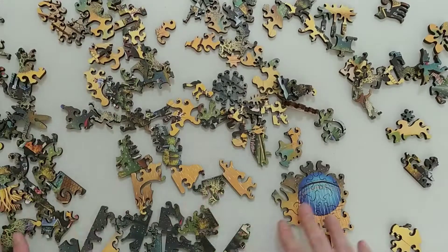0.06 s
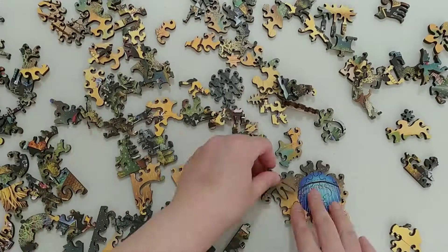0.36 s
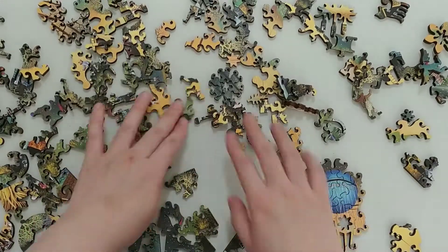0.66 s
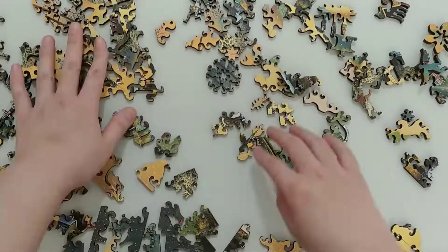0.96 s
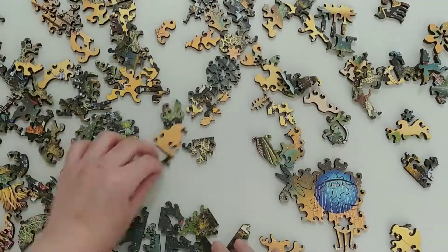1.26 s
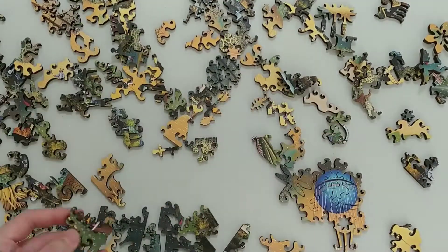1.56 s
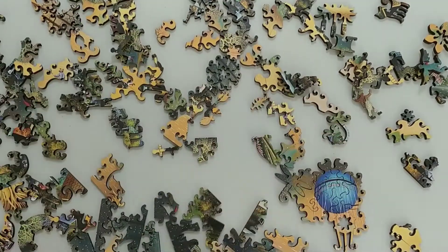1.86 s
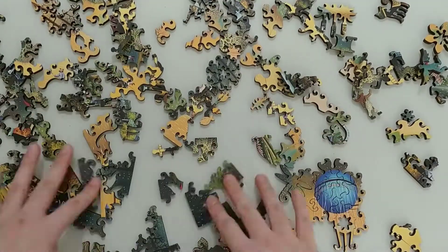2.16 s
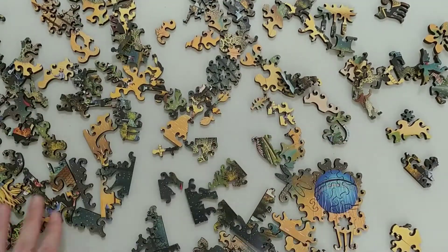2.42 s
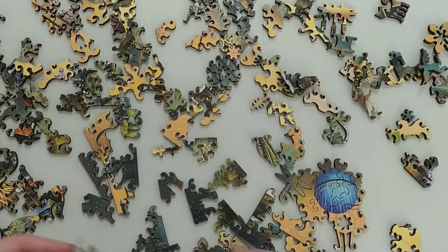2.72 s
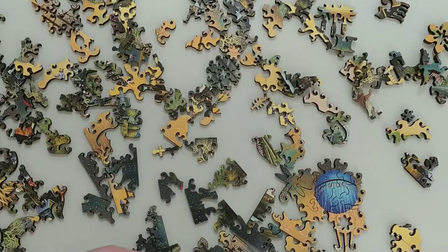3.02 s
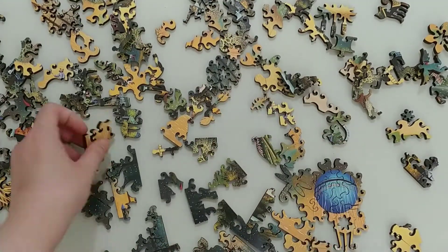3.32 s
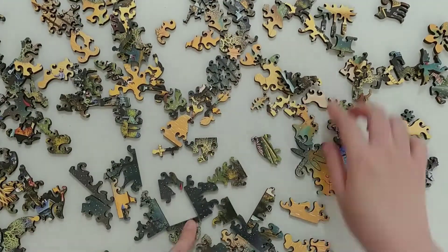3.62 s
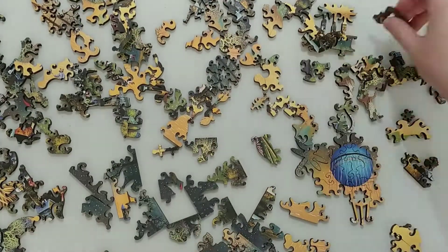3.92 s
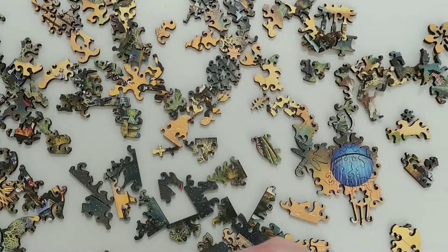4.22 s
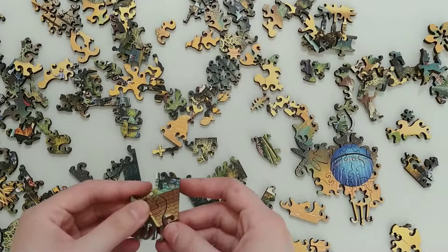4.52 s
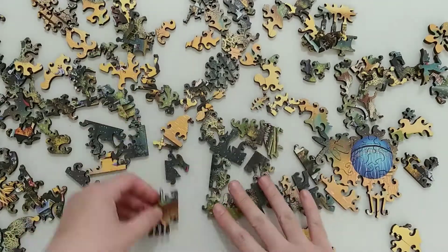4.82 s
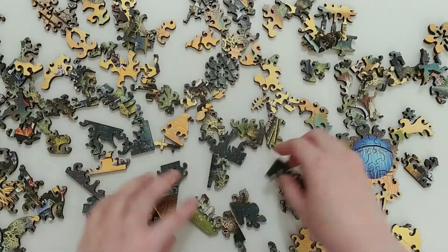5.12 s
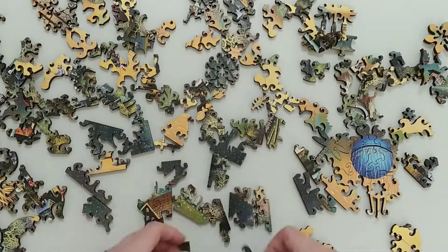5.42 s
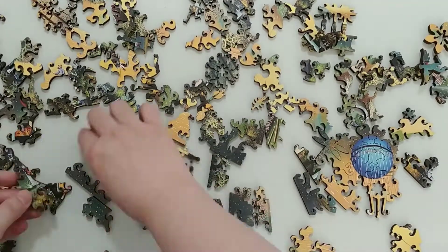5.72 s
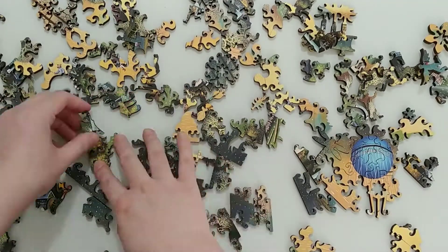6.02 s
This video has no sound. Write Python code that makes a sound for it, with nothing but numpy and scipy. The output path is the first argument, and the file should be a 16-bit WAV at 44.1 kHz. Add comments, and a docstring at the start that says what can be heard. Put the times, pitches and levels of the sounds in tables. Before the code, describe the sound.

Small wooden puzzle pieces tick, clack and slide on a table in an uneven, unhurried pattern. Short fingertip pushes and brief clicks come first, then a few longer rustling sweeps through the heap, a sparser moment, and more sharp clacks with a couple of dull hand bumps. The sound is close and in stereo, in a small room with a short echo and a soft, low background noise.

```python
"""At a table in a small quiet room, hands sort thin wooden jigsaw pieces close to a stereo microphone.
A pushed piece scrapes in tiny slips that also make the tabletop rumble.
A dropped or knocked piece chatters for a few milliseconds, rings briefly and thuds the tabletop.
Now and then a hand sweeps through the heap or bumps the table. The room adds echoes and soft noise."""
import sys
import numpy as np
from scipy import signal
from scipy.fft import rfft, irfft
from scipy.io import wavfile

SR = 44100
rng = np.random.default_rng(int(sys.argv[2]) if len(sys.argv) > 2 else 0)


def waveform_to_disk(signal):
    """Save audio, clipped to [-1, 1], as 16-bit WAV at the path in sys.argv[1]."""
    frames = np.transpose(np.atleast_2d(signal))
    scaled = np.clip(frames, -1, 1) * 32767
    samples = np.round(scaled).astype(np.int16)
    wavfile.write(sys.argv[1], SR, samples)


N = 276507

# the tone of wood touching wood, as coloured by the microphone: f/Hz, level/dB
CONTACT = [(200, -25.5), (450, 1.5), (700, 0), (1500, 0.5), (3000, -2), (3700, -5), (4500, -1),
           (5400, -0.5), (5900, -11.5), (8000, -9), (10500, -18), (12500, -31.5)]
KNOCK_S = .01  # knocks and bumps get the energy of a sound this long
LEAD_S = .012  # time for a knock or nudge to build up


def undb(db):
    """Turn decibels into a number to multiply by."""
    return 10 ** (np.asarray(db) / 20)


def colour(x, points, tilt_db=0):
    """Shape the tone of x with (f/Hz, level/dB) points, adding tilt_db per octave above 600 Hz."""
    size = 2048
    hz = np.maximum(np.arange(size // 2 + 1) * SR / size, 1)
    point_hz, point_db = np.transpose(points)
    db = np.interp(np.log(hz), np.log(point_hz), point_db) + tilt_db * np.log2(np.maximum(hz / 600, 1))
    # build the filter so that nothing comes out before the sound goes in
    cepstrum = irfft(np.log(undb(db)))
    cepstrum[1:size // 2] *= 2
    cepstrum[size // 2 + 1:] = 0
    response = irfft(np.exp(rfft(cepstrum)))
    return signal.fftconvolve(x, response[None], axes=1)[:, :x.shape[1]]


def mode(x, hz, t60):
    """Let x set one note ringing; the note fades by 60 dB in t60 seconds."""
    pole = np.exp((2j * np.pi * min(hz, .45 * SR) - np.log(1000) / t60) / SR)
    return signal.lfilter([1], [1, -pole], x).imag


def level(x, db, seconds):
    """Give x the energy of a steady sound of that level and length."""
    return x * undb(db) * np.sqrt(seconds * SR / (np.sum(x ** 2) / 2 + 1e-18))


def stereo_noise(count, width):
    """Left and right noise: alike at width 0, unrelated at width 1."""
    mid, side = rng.standard_normal((2, count))
    return np.array([mid + width * side, mid - width * side]) / np.hypot(1, width)


def pan(x, left_db):
    """Make the left side louder than the right by left_db."""
    return x * undb(np.array([[left_db], [-left_db]]) / 2)


def add(out, x, start, left_db=0):
    """Mix a sound in at its time and its side."""
    first = int(start * SR)
    x = pan(x[:, max(-first, 0):N - first], left_db)
    first = max(first, 0)
    out[:, first:first + x.shape[1]] += x


def mic_delay(x, max_s):
    """The two microphones hear a piece at slightly different times, depending on where it lies."""
    lag = int(rng.uniform(-1, 1) * max_s * SR)
    return np.array([np.roll(x[0], max(lag, 0)), np.roll(x[1], max(-lag, 0))])


def slide(speed, weight, grain_db=2.5, catch_db=3.5, catch_s=0.00597, snags_per_s=160):
    """Tiny slips hiss with the speed, catch unevenly and shake the table under the hand's weight."""
    # the tone of the tabletop under a sliding piece: f/Hz, level/dB
    tabletop = [(50, -17), (110, -3.5), (160, 1.5), (230, -3.5), (330, 0.5), (560, -5), (720, -7),
                (1100, -49)]
    count = len(speed)
    roughness = np.interp(np.arange(count) / SR / catch_s, np.arange(256), rng.standard_normal(256))
    catches = undb(catch_db * roughness)
    force = speed * catches
    slips = force * undb(grain_db * rng.standard_normal(count)) * stereo_noise(count, width=.65)
    # now and then a corner snags and ticks
    snags = force * (rng.random(count) < snags_per_s / SR) * stereo_noise(count, width=.65)
    scrape = colour(level(slips, 0, 1) + level(snags, -4, 0.93), CONTACT, tilt_db=-2.5)
    scrape = level(scrape, 0, np.sum(speed ** 2) / SR)
    shaking = weight * catches * stereo_noise(count, width=0.17)
    # each spot on the table hums its own hollow note, with little bass below it
    hollow_hz = 386 * 2 ** (0.43 * rng.uniform(-1, 1))
    hollow = np.gradient(mode(shaking, hollow_hz, t60=0.021), axis=1)
    rumble = level(colour(shaking, tabletop), 0, 1) + level(hollow, -5, 1)
    rumble = level(rumble, 0, np.sum(weight ** 2) / SR)
    return mic_delay(scrape + rumble, max_s=.0002)


def nudge(seconds, scrape_db, swell=0.05):
    """A fingertip pushes a piece, which speeds up and stops."""
    seconds = max(seconds, .008)
    t = np.arange(int(seconds * SR) + 3072) / SR - LEAD_S
    ramp_s = .002 + 0.1 * seconds
    fade_in = np.minimum(1 + t / LEAD_S, 1)
    moving = (1 + np.tanh(t / ramp_s)) * (1 + np.tanh((seconds - t) / ramp_s)) * fade_in
    speed = moving * np.exp(-swell * (2 * t / seconds - 1) ** 2)  # fastest half way
    speed = speed * np.sqrt(seconds * SR / np.sum(speed ** 2))
    # the hand's weight sets the rumble, so a louder scrape adds only a little
    rumble_db = -45 + 0.22 * (scrape_db + 45.5)
    return slide(speed * undb(scrape_db), speed * undb(rumble_db))


def room_tone():
    """Soft steady noise with a low boom of the room in it."""
    # the tone of the room's noise: f/Hz, level/dB
    air_tone = [(13, -32), (22, -14.5), (55, -9), (112, -21), (177, -11.5), (191, -16), (293, -26),
                (438, -22), (603, -28), (2480, -39), (4840, -46.5), (5990, -52.5), (8480, -53),
                (13000, -66)]
    air = colour(stereo_noise(N, width=0.79), air_tone)
    boom = mode(stereo_noise(N, width=.15), hz=158, t60=.07)
    return level(air, -53.5, N / SR) + level(boom, -66, N / SR)


def room_echo(x, near_t60=0.044, tail_t60=0.27, build_up_s=0.0036):
    """Bright early echoes from things nearby, then a faint, dull tail from the walls."""
    # the tone of the echo from the walls: f/Hz, level/dB
    walls = [(150, 10.5), (400, 1.5), (1500, -4), (5000, -17.5), (11000, -22)]
    count = SR // 2
    t = np.arange(count) / SR
    arrival = 1 - np.exp(-(t / build_up_s) ** 2)
    near = stereo_noise(count, width=0.61) * arrival * undb(-60 * t / near_t60)
    tail = stereo_noise(count, width=0.53) * arrival * undb(-60 * t / tail_t60)
    echoes = level(near, -13, 1 / SR) + colour(level(tail, -16, 1 / SR), walls)
    return signal.fftconvolve(x, echoes, axes=1)[:, :N]


def piece_ring(chatter, hz):
    """Chatter makes a thin piece bend to and fro, so it rings with three short notes."""
    # the notes of a bending piece: pitch/multiple of hz, level/dB, time to fade by 60 dB/s
    notes = [(1, 0, .0075), (.82, -2, .007), (1.47, -16, .004)]
    ring = sum(level(mode(chatter, hz * ratio, t60), db, KNOCK_S) for ratio, db, t60 in notes)
    # the bending sends the ring to the right a fifth of a cycle late
    ring = np.array([ring[0], np.roll(ring[1], int(.2 * SR / hz))])
    # a small piece gives off little sound below its own notes
    return signal.sosfilt(signal.butter(2, hz * .65, "high", fs=SR, output="sos"), ring)


def table_thud(contact, db, soft_hz=366, hard_hz=604):
    """A light blow thuds low; a hard one reaches the tabletop's higher note."""
    hardness = 1 / (1 + np.exp((-32.5 - db) / 1.1))
    hz = soft_hz + (hard_hz - soft_hz) * hardness
    blow = level(contact * stereo_noise(contact.size, width=0.41), -3, 1 / SR)
    blow[:, int(LEAD_S * SR)] += 1  # the whole weight lands at once, amid the chatter
    thud = mode(blow, hz, t60=0.017)
    thud = signal.sosfilt(signal.butter(2, hz * 0.59, "high", fs=SR, output="sos"), thud)
    return pan(thud, left_db=2.3)


def knock(decay_s, crack_db, thud_db, ring_hz, ring_db, grain_db=5):
    """A piece lands: its edges chatter with a crack, it rings and the table gives a thud."""
    count = 4096
    t = np.arange(count) / SR - LEAD_S
    decay_s = max(decay_s, .0005)
    before, after = np.maximum(-t, 0), np.maximum(t, 0)
    # one edge touches first; a flat landing takes longer both to build up and to settle
    contact = np.exp(-before / (0.24 * decay_s) - after / decay_s)
    settling = undb(-20) * np.exp(-before / 0.0024 - after / 0.0046)
    grain = undb(grain_db * rng.standard_normal(count))
    chatter = np.hypot(contact, settling) * grain * stereo_noise(count, width=.5)
    # smaller, higher-pitched pieces and harder blows crack brighter
    tilt_db = 2.13 * np.log2(ring_hz / 2900) + 0.27 * (crack_db + 34)
    crack = level(colour(chatter, CONTACT, tilt_db), crack_db, KNOCK_S)
    ring = level(piece_ring(chatter, ring_hz), ring_db, KNOCK_S)
    thud = level(table_thud(contact, thud_db), thud_db, KNOCK_S)
    return mic_delay(crack + ring + thud, max_s=.00005)


def sweep(stroke, scrape_boost_db=5, rumble_boost_db=0.5, release_s=0.013):
    """A flat hand drags several pieces along, then lets them come to rest."""
    times, scrape_db, rumble_db = np.transpose(stroke)
    t = times[0] + np.arange(int((times[-1] - times[0]) * SR) + 3072) / SR
    release = np.exp(-np.maximum(t - times[-1], 0) / release_s)
    speed = release * undb(np.interp(t, times, scrape_db) + scrape_boost_db)
    weight = release * undb(np.interp(t, times, rumble_db) + rumble_boost_db)
    return slide(speed, weight)


def bump(hz, db, press_s=0.0004, ring_cycles=9):
    """A soft hand presses the table slowly, so only a low note answers."""
    t = np.arange(8192) / SR
    press = t * np.exp(-t / press_s)
    thump = np.gradient(mode(press, hz, t60=ring_cycles / hz))
    return level(np.array([thump, thump]), db, KNOCK_S)


def scene(hands_left_db=0.94):
    """All slides, knocks and bumps on the table, in the room; the hands work a little left of centre."""
    # short pushes by a fingertip: t/s, length/s, scrape level/dB
    nudges = [(0.0, 0.057, -51.5), (0.128, 0.0097, -44), (0.181, 0.033, -45.5), (0.384, 0.043, -43.5),
              (0.482, 0.047, -46.5), (0.586, 0.031, -48), (0.68, 0.076, -51), (0.768, 0.08, -49),
              (0.868, 0.084, -49), (1.715, 0.026, -39.5), (1.77, 0.018, -37.5), (1.801, 0.046, -45),
              (2.137, 0.055, -45.5), (2.245, 0.02, -49.5), (2.345, 0.018, -51.5), (2.46, 0.059, -41),
              (2.558, 0.02, -59), (2.6, 0.006, -48), (3.188, 0.0076, -57), (3.245, 0.042, -44.5),
              (3.596, 0.048, -45), (3.786, 0.019, -45.5), (3.909, 0.02, -52), (3.995, 0.023, -39),
              (5.019, 0.027, -41), (5.106, 0.067, -55.5), (5.199, 0.017, -52.5), (5.26, 0.018, -42.5),
              (5.396, 0.018, -46.5), (5.432, 0.063, -58.5), (5.601, 0.02, -45), (5.679, 0.04, -41),
              (5.737, 0.04, -47.5), (5.905, 0.014, -39), (5.932, 0.053, -59.5), (6.043, 0.045, -51),
              (6.099, 0.039, -47.5), (6.171, 0.046, -49.5)]
    # pieces landing or knocking together:
    # t/s, chatter decay/s, crack level/dB, thud level/dB, ring f/Hz, ring level/dB
    knocks = [(0.2796, 0.0074, -43.5, -54, 1190, -54), (0.3549, 0.0036, -30, -30, 2760, -69),
              (0.6466, 0.0091, -30, -36.5, 1090, -38), (0.6998, 0.005, -40.5, -47.5, 4800, -48),
              (0.8347, 0.0051, -37.5, -37, 2200, -58), (0.915, 0.0047, -42.5, -49, 4520, -50),
              (1.2824, 0.003, -39, -37, 5280, -32), (1.742, 0.0025, -27.5, -31.5, 1610, -43),
              (1.766, 0.0026, -32, -40.5, 1450, -30.5), (1.8628, 0.005, -38.5, -45, 4470, -48.5),
              (2.3812, 0.008, -46.5, -42.5, 1860, -53), (2.831, 0.0068, -61, -40, 900, -67),
              (2.8737, 0.0052, -44.5, -51, 1320, -52.5), (2.975, 0.0082, -47, -43.5, 1720, -50.5),
              (3.2128, 0.0062, -32, -36.5, 3130, -35.5), (3.7529, 0.0065, -37.5, -49, 4520, -42),
              (3.8797, 0.0028, -37, -45, 1390, -43.5), (4.0073, 0.00099, -34.5, -25.5, 3150, -30),
              (4.0106, 0.0015, -34.5, -31, 1140, -29.5), (4.0299, 0.00049, -30, -33, 3280, -42),
              (4.1271, 0.0081, -68, -47, 970, -44), (4.8443, 0.0038, -44.5, -53, 4640, -43),
              (4.8978, 0.00068, -30.5, -38, 5170, -30.5), (4.955, 0.0012, -51.5, -51, 4660, -52.5),
              (5.0983, 0.011, -36.5, -49, 4500, -44), (5.1465, 0.0036, -46.5, -60, 4900, -50),
              (5.4212, 0.005, -35, -39, 4800, -42), (5.8019, 0.0025, -31.5, -35.5, 4550, -30),
              (5.9285, 0.0085, -39, -44, 4230, -35.5), (6.0623, 0.0086, -38, -57, 4400, -58)]
    # a hand in the heap, one curve a stroke, before the boosts: t/s, scrape level/dB, rumble level/dB
    sweeps = [
        [(0.975, -70, -53.5), (1.033, -48, -40), (1.053, -52.5, -47.5), (1.199, -52, -47), (1.221, -49, -39),
         (1.265, -74, -65)],
        [(1.32, -62, -49.5), (1.38, -58, -47.5), (1.39, -47.5, -45.5), (1.532, -68, -54.5), (1.546, -59.5, -54),
         (1.6, -86, -79)],
        [(1.91, -73, -60), (1.916, -87, -57), (1.936, -50, -48), (1.98, -45.5, -42), (2.058, -61.5, -51),
         (2.09, -91, -80)],
        [(4.66, -82, -64), (4.7, -51.5, -46), (4.712, -62, -46.5), (4.73, -50, -42.5), (4.818, -50.5, -39.5),
         (4.836, -66, -42)],
    ]
    # soft bumps of a hand on the table: t/s, f/Hz, level/dB
    bumps = [(1.291, 130, -36.5), (4.924, 140, -38.5), (5.399, 297, -34)]
    table = np.zeros((2, N))
    for start, *push in nudges:
        add(table, nudge(*push), start - LEAD_S, hands_left_db)
    for start, *blow in knocks:
        add(table, knock(*blow), start - LEAD_S, left_db=0.2)
    for stroke in sweeps:
        add(table, sweep(stroke), stroke[0][0], hands_left_db)
    for start, hz, db in bumps:
        add(table, bump(hz, db), start)
    return table + room_tone() + room_echo(table)


def record(dry):
    """Cut away the treble above 12 kHz."""
    return signal.sosfilt(signal.ellip(8, .2, 70, 12000, fs=SR, output="sos"), dry)


dry = scene()
out = record(dry)
waveform_to_disk(out)
```